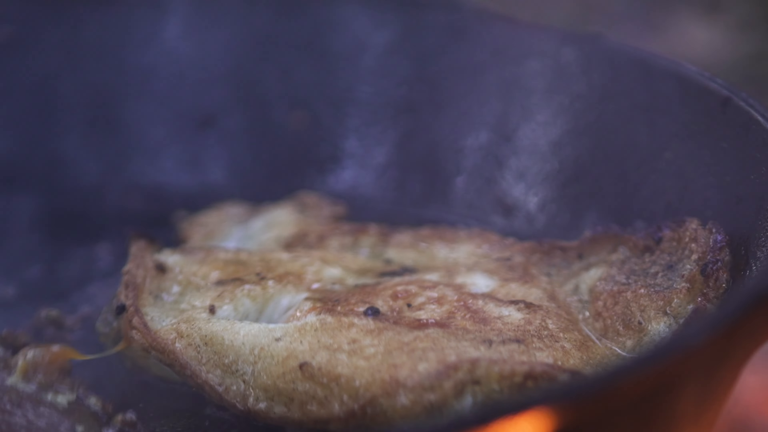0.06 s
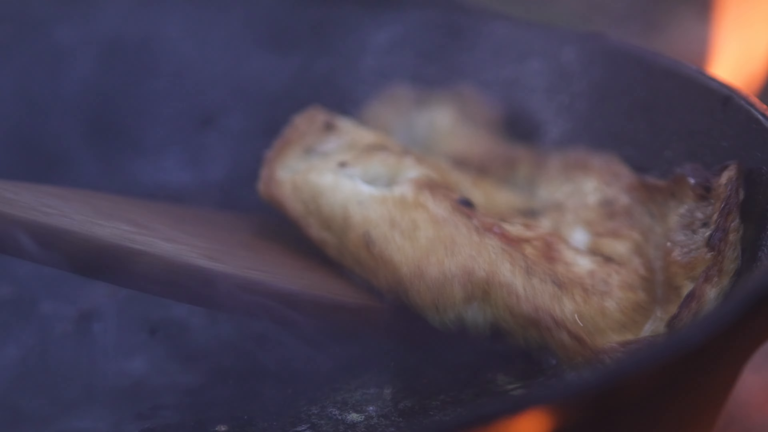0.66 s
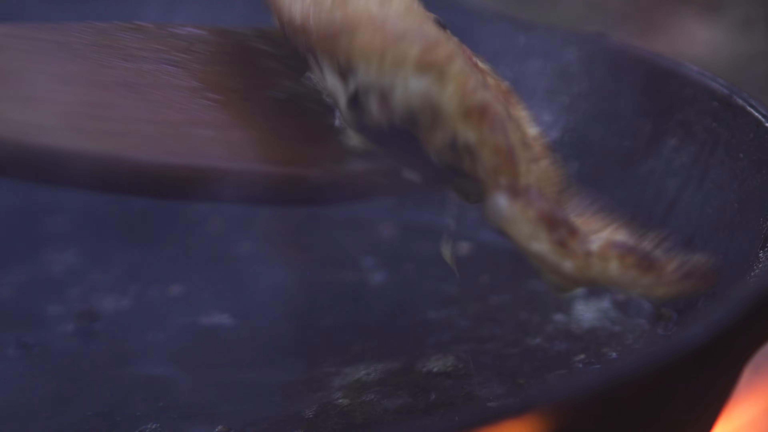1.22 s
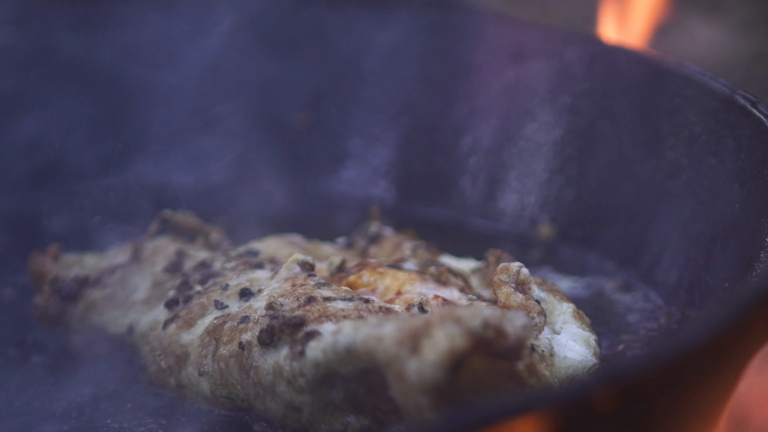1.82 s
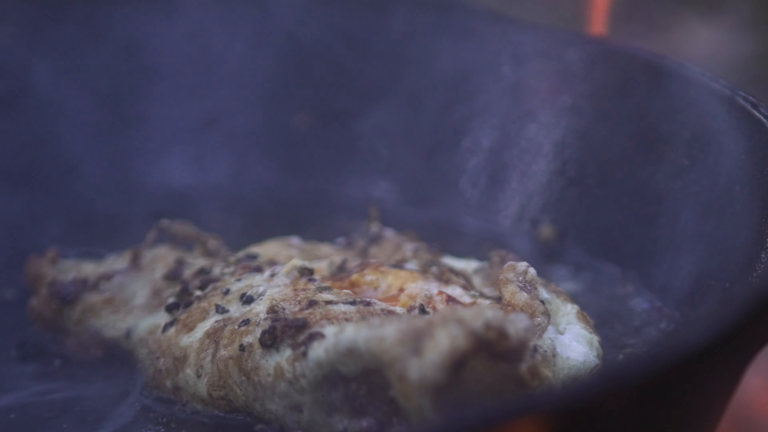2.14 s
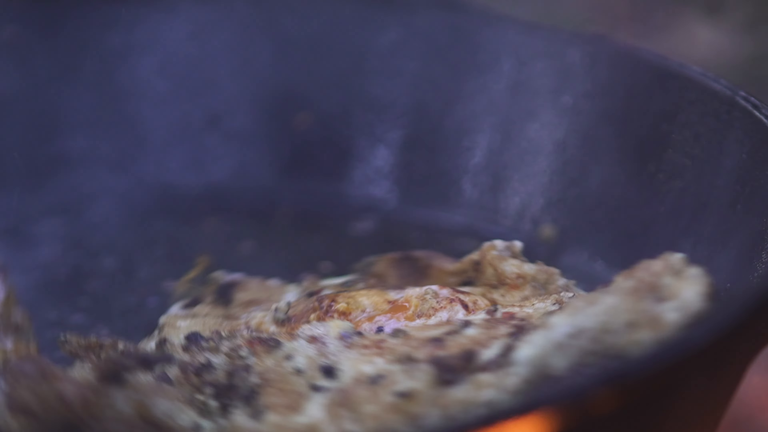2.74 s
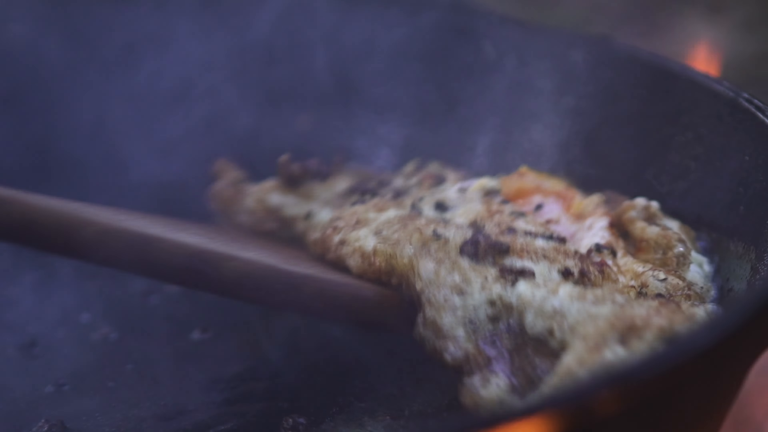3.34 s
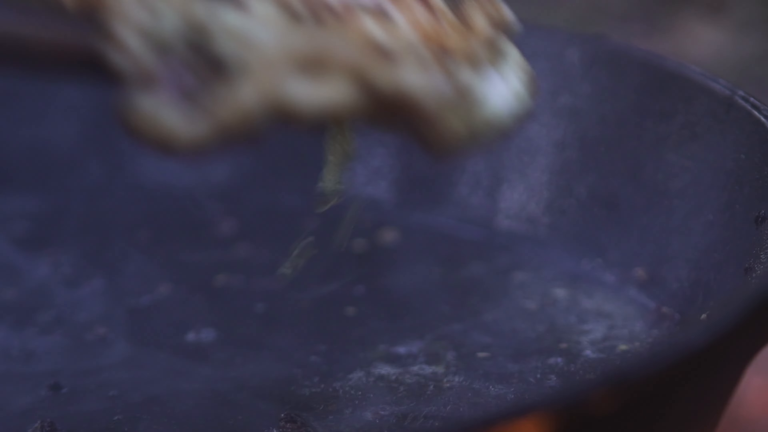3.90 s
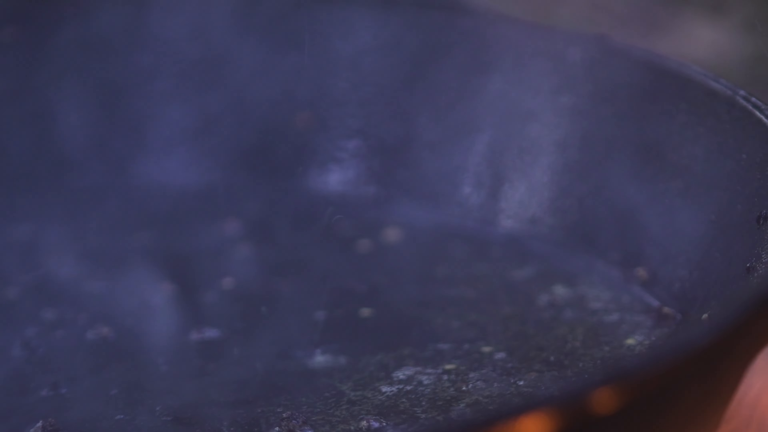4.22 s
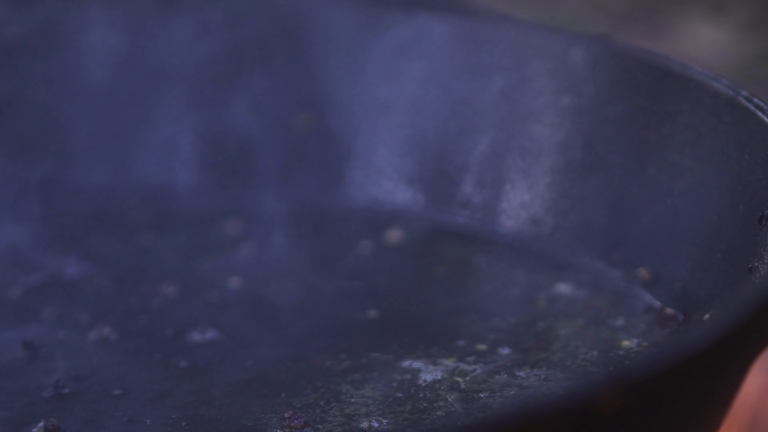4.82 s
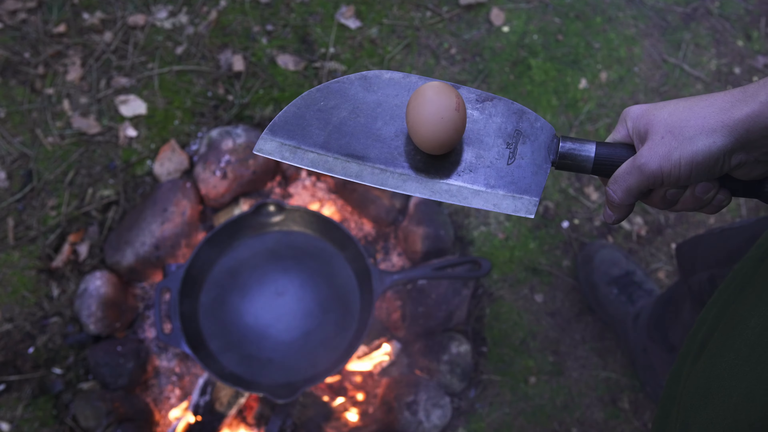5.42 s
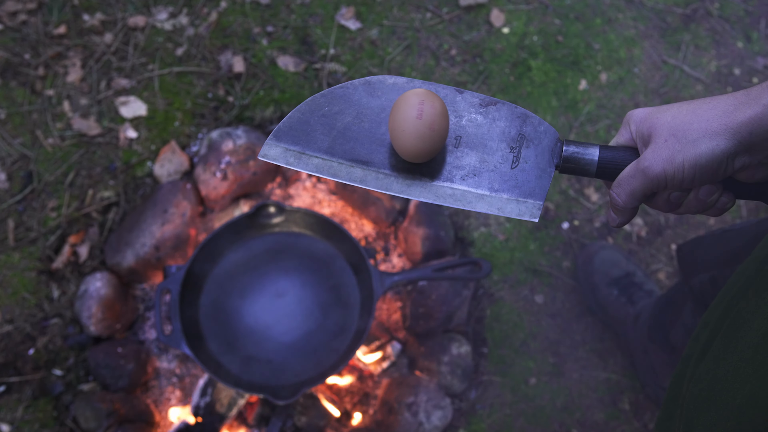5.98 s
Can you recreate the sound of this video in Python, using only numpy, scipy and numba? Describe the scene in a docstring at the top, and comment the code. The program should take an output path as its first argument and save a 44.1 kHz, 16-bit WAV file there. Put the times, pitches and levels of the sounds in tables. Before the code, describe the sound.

An egg sizzles in hot fat in a cast-iron skillet, heard very close in the open air: a bright hiss of tiny bubbles dotted with sharp spits. At about 1.1 seconds the sizzle sinks as the egg leaves the iron, then surges at 1.5 seconds when it lands flipped over. The frying stays stronger and swells again, loudest between about 2.4 and 2.9 seconds, thick with hard cracks of spitting fat. At 2.4 seconds a wooden spatula knocks the pan once, with a short, damped metallic ring, and a very sharp spit follows. The sizzle eases in smaller surges from 3 seconds and drops near 4 seconds as the egg is lifted out. The leftover fat thins to separate spits, its hiss gone by about 5 seconds, with a few faint pops and a soft knock near 5.6 seconds. A campfire flutters low and faint throughout.

```python
"""An egg fries close up in hot fat, in a cast-iron skillet over a softly fluttering campfire. Every pop from
the fat is a steam pocket that rings briefly, takes the colour of the pan's hollow and tickles the iron. Near
1.5 s a wooden spatula flips the egg and the sizzle surges; at 2.4 s it knocks the pan. Then it lifts the egg
out, and from about 4 s the fat left behind thins out to single spits; near the end the fire itself pops."""
import sys
import numpy as np
from scipy import signal
from scipy.fft import rfft, irfft
from scipy.io import wavfile
from scipy.ndimage import uniform_filter1d
from numba import njit

SR = 44100
rng = np.random.default_rng(int(sys.argv[2]) if len(sys.argv) > 2 else 0)


def inscribe(sig):
    """Save sig as 16-bit PCM at rate SR to the path in sys.argv[1].

    A 1-D sig is mono; a 2-D sig holds one channel per row.
    Samples are clipped to [-1, 1] before scaling.
    """
    pcm = np.round(np.clip(np.atleast_2d(sig).T, -1, 1) * 32767)
    wavfile.write(sys.argv[1], SR, pcm.astype(np.int16))


N = 271197
TOP_HZ = 16000  # ceiling for pitches and for the mix


# tone of the sizzle, against its mids: t/s, bass/dB, treble/dB
SIZZLE_TONE = [(0, -3.5, 6), (.13, -8.5, 2), (.19, -6.5, -4.5), (.9, -8, -2.5), (1.0, -9.5, -3.5),
               (1.35, 0, -2.5), (1.52, -12, 4.5), (1.6, -9, -5), (1.83, -4.5, 4.5), (2.0, -8, -0.5),
               (2.55, -14, -7), (2.75, -13, -4), (3.05, -9, -4.5), (3.33, -10.5, -2), (3.6, -13.5, -9),
               (3.76, -12, 0), (3.87, -10, -6.5), (4.1, -11.5, 1.5), (4.35, -8.5, 6.5), (4.9, -14, -3.5),
               (5.45, -4.5, -3.5)]

def sizzle(level_db, count=70000):
    """Thousands of tiny bubbles burst in clusters; the wetter the fat, the denser and louder."""
    bass_db, treble_db = curves(SIZZLE_TONE)
    boil = undb(0.77 * (level_db + 25.5))
    at, alive = random_times(4800 * boil * undb(2.7 * walk(size=200)), count)
    size = undb(4.38 * np.minimum(rng.exponential(size=count), 4.2))
    hz = np.clip(5200 * np.exp(0.736 * rng.standard_normal(count)), 600, TOP_HZ)
    # small bubbles ring for a few cycles; violent ones tear open with a dry crack
    q = 1.24 * 8 ** rng.random(count) / size ** 0.22
    crackle = pops(at[alive] / SR, size[alive], hz[alive], q[alive], soft=0.)
    # steam hisses between the pops and dries up before they do
    hiss = undb(3.5) * boil ** 0.97 * rng.standard_normal(N)
    bubbles = bowl(crackle + hiss)
    # large, middling and tiny bubbles each follow their own share of the boil
    bass, below_treble = (signal.sosfiltfilt(signal.butter(4, split_hz, fs=SR, output="sos"), bubbles)
                          for split_hz in (2000, 7000))
    flicker_db = 2 * walk(size=1300)
    bands = [(bass, bass_db), (below_treble - bass, 0), (bubbles - below_treble, treble_db + flicker_db)]
    return sum(even(band, size=2200) * undb(level_db + db - 3) for band, db in bands)


# bed of frying, which sinks whenever the egg is off the iron and dries up at the end: t/s, level/dB
FRYING_BED = [(0, -32), (.2, -32.5), (.9, -32.5), (1.12, -36), (1.2, -42.5), (1.44, -38), (1.6, -29.5),
              (1.86, -27.5), (2.1, -25), (3.0, -24.5), (3.33, -29), (3.8, -31), (4.02, -41.5),
              (4.45, -44.5), (4.85, -48.5), (5.05, -60), (5.45, -71), (5.7, -75.5)]
# wet egg lands, is pushed onto hot iron or drips: t/s, rise/s, hold/s, decay/s, level/dB
SURGES = [(1.452, 0.13, 0.055, 0.12, -18.5), (1.881, 0.1, 0.006, 0.071, -26),
          (2.156, 0.555, 0.22, 0.022, -20), (3.052, 0.076, 0.083, 0.11, -23.5),
          (3.334, 0.12, 0.17, 0.069, -26), (4.079, 0.055, 0.013, 0.086, -34),
          (4.227, 0.036, 0.015, 0.03, -42.5)]

def boiling():
    """The sizzle's fader in dB: steady frying plus the surges."""
    steady_db, = curves(FRYING_BED)
    surges = sum(undb(db) * swell(*shape) for *shape, db in SURGES)
    return 20 * np.log10(np.hypot(undb(steady_db), surges))


# featured spits: t/s, level/dB, f/Hz, ring/Q, spatter against the spit/dB
SPITS = [(0.0463, -15.5, 5450, 0.49, -6), (0.076, -23.5, 6600, 0.9, 6), (0.1235, -21.5, 8200, 2.9, -20),
         (0.134, -23, 6370, 4.1, 6), (0.2546, -29, 3350, 1.6, 9.5), (0.296, -24, 2640, 6.8, 3),
         (0.4242, -17, 3950, 8.2, -3.5), (0.4733, -15, 2620, 3.5, -11), (0.496, -27, 6800, 18, -10),
         (0.5757, -20.5, 3260, 7.1, -6), (0.6599, -24.5, 2650, 3.7, 2.5), (0.6886, -16, 4550, 5, -14),
         (0.7445, -27.5, 10500, 3, 3), (0.7823, -23, 9150, 2.3, 1), (0.8734, -17.5, 4350, 3.2, -23),
         (0.8911, -23.5, 3570, .8, 2), (0.907, -20.5, 4330, 11, -18), (1.0637, -16.5, 4240, 0.37, -4.5),
         (1.1394, -26.5, 6600, 6, -4), (1.2592, -26.5, 3270, 3.3, -4), (1.2896, -22, 3460, 0.59, -20),
         (1.3684, -23.5, 4700, 4, -10), (1.3991, -23, 5000, 17, -22), (1.4852, -15.5, 4630, 5.6, -9),
         (1.7146, -12.5, 3800, 3, -23), (1.7474, -8.5, 2480, 0.59, -21), (1.8166, -14, 5600, 1.3, -9),
         (1.9148, -12, 4000, 0.8, -16), (1.9998, -13, 4360, 3.5, -24), (2.0076, -12.5, 4000, 1.5, -20),
         (2.3129, -11, 4430, 3.1, -14), (2.5556, -2, 4600, 4.1, -41), (2.5837, -10, 4970, 6.3, -20),
         (2.6776, -15, 6680, .78, -5), (2.737, -12.5, 6000, 0.45, -2), (2.7905, -10.5, 3360, .67, -14),
         (2.8156, -10.5, 4100, 0.46, -26), (2.8376, -14, 4660, 8.5, -24), (2.868, -13, 2400, 12, -10),
         (2.8767, -10, 4520, 4.7, -16), (2.8825, -8, 4000, 0.46, -29), (2.9073, -9, 4300, 3, -19),
         (2.9125, -11, 5000, 1.5, -12), (2.938, -12.5, 4200, 2.2, -12), (3.0066, -18, 5000, 1.4, -19),
         (3.1534, -10, 2290, 18, -5), (3.2596, -12.5, 3570, 3.5, -1), (3.427, -23, 5400, 0.83, -6),
         (3.4845, -17.5, 2800, 2.6, 4.5), (3.5837, -6.5, 2230, 7.3, -2.5), (3.861, -18, 3870, 4.4, -13),
         (3.9609, -17.5, 3500, 2.3, -22), (4.039, -18.5, 3030, 2.8, -4), (4.1155, -17, 3280, 5.1, -8),
         (4.2197, -14, 5470, 1.2, -10), (4.3169, -23, 5500, 8, -7), (4.4288, -39, 7850, 5, -18),
         (4.437, -26.5, 3400, 5.2, -10), (4.4843, -25.5, 7100, 9.6, -12), (4.545, -30.5, 7450, 1.3, 1),
         (4.6099, -23.5, 5800, 2.8, -5), (4.6478, -22.5, 9800, 1.1, -25), (4.6733, -24.5, 8700, 0.72, -31),
         (4.725, -27, 7460, 1.5, -9), (4.7787, -25, 3040, 0.79, -1), (4.8098, -16.5, 3500, 12, -24),
         (4.8205, -29, 4680, 2.6, -20), (4.8755, -36.5, 8520, 0.8, -11), (4.9275, -34.5, 6360, 13, -10),
         (4.9412, -31.5, 3230, 0.6, -9), (5.0095, -37.5, 3300, 1.5, -18), (5.023, -29, 3730, 8.5, -8.5),
         (5.041, -46, 8600, 1.5, -1), (5.0712, -37.5, 3000, 1, -19), (5.1897, -18, 6140, 1.6, -18),
         (5.2318, -32, 4900, 1.2, -19), (5.2528, -30, 10700, 4.3, -22), (5.3065, -38, 8400, 5.1, -15),
         (5.3665, -23.5, 5050, 8.6, -18), (5.3798, -40, 6720, 3.6, -17), (5.6192, -32, 2355, .5, -15.5),
         (5.8325, -40, 4890, 6.5, -23)]

def spits(level_db):
    """Large steam pockets crack amid spattering droplets, and near the end the fire itself pops; returns the
    sound and the kick to the iron."""
    s, db, hz, q, spatter_db = np.vstack([SPITS, stray_spits(level_db)]).T.copy()
    hz, q = np.minimum(hz, TOP_HZ), np.maximum(q, .5)
    spatter = np.zeros(N)
    for start, pitch, droplets_db in zip(s, hz, db + spatter_db):
        # the pocket starts to leak just before it cracks
        add(spatter, start - .0012, undb(droplets_db) / 2 * burst(pitch, octaves=1.4, rise_s=0.0019))
    cracks = pops(s, undb(db), hz, q, soft=0.)
    # the longer a pocket rings, the harder it kicks the iron
    kick_db = -67 + 14.5 * np.log10(q)
    kick = pops(s, undb(db + kick_db), hz, q, soft=0.)
    return bowl(cracks + spatter), kick


def stray_spits(level_db, per_second=17, count=200):
    """Lesser spits come by chance and grow louder with the sizzle; returns rows like those of SPITS."""
    at, alive = random_times(np.full(N, per_second), count)
    loud, pitch, ring = np.clip(rng.standard_normal((count, 3)), -2, 2).T
    db = -31.5 + 0.97 * (level_db[at] + 30.5) + 6.5 * loud
    hz = 5290 * 2 ** (.5 * pitch)
    q = 3.6 * 2 ** ring
    spatter_db = np.full(count, -6)
    return np.column_stack([at / SR, db, hz, q, spatter_db])[alive]


# steam squeezed out under the egg and through the fat: t/s, f/Hz, level against the sizzle/dB
SQUEAKS = [(0, 6360, 1.5), (.5, 6100, -11), (1.15, 6160, -19.5), (1.45, 5150, -4), (2.45, 5000, -2.5),
           (2.8, 4900, -1.5), (3.0, 2700, -3.5), (3.3, 3300, -17.5), (3.53, 3840, -3.5), (3.73, 5600, -4.5),
           (3.88, 5100, 6), (4.12, 4470, 4), (4.5, 7730, 9), (4.7, 7100, -12)]

def squeaks(level_db, count=8000):
    """Steam forced through narrow gaps: tiny, soft-edged blips whose pitch follows the gap."""
    centre_hz, share_db = curves(SQUEAKS)
    at, alive = random_times(520 * undb(.45 * (level_db + 28.5)), count)
    hz = np.minimum(centre_hz[at] * np.exp(0.19 * rng.standard_normal(count)), TOP_HZ)
    size = undb(6.5 * np.minimum(rng.standard_normal(count), 1.7))
    q = 2 * 3.2 ** rng.random(count)
    blips = pops(at[alive] / SR, size[alive], hz[alive], q[alive], soft=1.)
    return even(blips, size=3500) * undb(level_db + share_db)


def under_egg(x, centre_s=2.55, span_s=.15, hz=7600, width_hz=1630, dip_db=-7):
    """The egg lies flat over the bubbles for a moment and scoops one band out of their treble."""
    depth_db = dip_db * np.exp(-((np.arange(N) / SR - centre_s) / span_s) ** 2)
    band = signal.lfilter(*signal.iirpeak(hz, hz / width_hz, fs=SR), x)
    return x + (undb(depth_db) - 1) * band


# air resonances between the pan's floor and walls: f/Hz, width/Hz, boost/dB
CAVITY_PEAKS = [(1916, 170, 3.5), (2900, 130, 4.5), (3687, 350, 2), (5700, 1200, 2), (10000, 580, 0.5)]
# EQ on the bubbles as they leave the pan: f/Hz, gain/dB
BOWL_EQ = [(100, -23.5), (350, -18), (550, -6), (1000, -5), (1600, -4), (2000, -1.5), (4500, 3),
           (7000, 5.5), (10000, 9), (15500, 3.5)]

def bowl(x):
    """The hollow of the pan lifts a few broad resonances and thins the bass."""
    for hz, width, db in CAVITY_PEAKS:
        x = x + (undb(db) - 1) * signal.lfilter(*signal.iirpeak(hz, hz / width, fs=SR), x)
    return colour(x, BOWL_EQ)


# spatula and egg rubbing on the pan floor: t/s, hold/s, level/dB
RUBS = [(-.04, 0.49, -85.5), (0.76, 0.035, -88), (1.426, 0.17, -81), (2.56, 0.087, -76), (2.85, .35, -90.5)]
# wooden spatula hitting the pan: t/s, level/dB
SPATULA_HITS = [(1.426, -34), (2.4196, -13.5)]

def spatula():
    """Force of soft wood rubbing and knocking on the iron, dull enough to wake mainly its low modes."""
    strokes = sum(undb(db) * swell(s, rise_s=.045, hold_s=hold, fall_s=.085) for s, hold, db in RUBS)
    friction = unit(butter(rng.standard_normal(N), 769, "lowpass", order=4))
    force = friction * strokes * undb(2 * walk(size=700))
    contact = np.hanning(50)  # about a millisecond
    for s, db in SPATULA_HITS:
        add(force, s, undb(db) * contact / contact.sum())
    return force


# ring of the cast iron: f/Hz, level/dB, t60/s
IRON_MODES = [(555, -4, .21), (964, 4, 0.049), (1906, -11, 0.037), (2640, -4.5, .12), (2950, 1, 0.15),
              (3090, -1, .13), (3290, 3, .19), (3560, 1.5, .11), (3970, 5, .11), (4216, -11.5, 0.097),
              (4480, 6, .12), (4823, -20.5, .15), (5370, 6.5, 0.1), (5992, -8.5, .14), (6350, 1.5, .08),
              (6700, -4.5, .08), (8300, -3.5, .06), (9200, -3.5, .06)]

def skillet(force):
    """The iron rings in its modes, damped by the food and the fire bed."""
    t = np.arange(SR // 2) / SR
    ring = sum(undb(db) * np.cos(2 * np.pi * hz * t) * np.exp(-np.log(1000) * t / t60)
               for hz, db, t60 in IRON_MODES)
    # a small pan radiates little bass
    return butter(signal.fftconvolve(force, ring)[:N], 450, "highpass", order=5)


# low thumps under the sizzle: t/s, level/dB, f/Hz, length/s
THUMPS = [(.473, -40, 213, .0056), (.776, -40, 220, .01), (1.094, -39, 160, .009), (2.554, -30, 157, .003),
          (2.834, -30.5, 170, .004), (2.88, -36, 200, .0035), (4.218, -44, 260, .004),
          (4.696, -52, 400, .048), (4.888, -51, 830, .004), (4.978, -41, 750, .0022),
          (5.082, -53, 404, .0035), (5.589, -49, 450, .01), (5.615, -36, 330, .007),
          (5.617, -38.5, 1100, .0032)]

def thumps():
    """Short, dull thumps: some sit under the loudest, overloaded spits; others are soft knocks and puffs."""
    out = np.zeros(N)
    for s, db, hz, length in THUMPS:
        add(out, s, undb(db) * burst(hz, octaves=2, rise_s=length / 2))
    return out


# dark EQ of the flames and the still air: f/Hz, gain/dB
FLAME_EQ = [(20, -2), (60, -1.5), (130, 2.5), (220, 3.5), (400, -8), (800, -17.5), (2000, -26),
            (6000, -31.5), (16000, -33)]
# draught of the fire: t/s, level/dB
DRAUGHT = [(0, -52.5), (1.9, -54), (3.5, -60.5), (5.3, -60.5), (5.55, -55), (6.15, -58)]

def flames():
    """The fire flutters softly under the pan, riding its draught."""
    draught_db, = curves(DRAUGHT)
    rumble = unit(colour(rng.standard_normal(N), FLAME_EQ))
    return rumble * undb(draught_db + 2 * walk(size=900))


def surroundings(x, size=8192):
    """Stones and ground scatter each band into a short diffuse tail; trees return a faint longer one."""
    t = np.arange(size) / SR
    fade = sum(undb(2 * db) * np.exp(-t / decay_s) / (decay_s * SR)
               for db, decay_s in [(-17, .0013), (-27, .012)])
    edges_hz = np.geomspace(700, TOP_HZ, 9)
    out = x
    for band in zip(edges_hz, edges_hz[1:]):
        power = signal.fftconvolve(butter(x, band, "bandpass", order=3) ** 2, fade)[:N]
        wash = unit(butter(rng.standard_normal(N), band, "bandpass", order=3))
        out = out + np.sqrt(np.abs(power)) * wash
    return out


@njit
def pops(s, size, hz, q, soft):
    """Each bursting bubble is a damped sine whose energy follows size; soft (0-1) rounds its attack."""
    out = np.zeros(N)
    for k in range(len(s)):
        first = int(s[k] * SR) + 1
        tau = q[k] / (np.pi * hz[k])
        pole = -1 / tau + 2j * np.pi * hz[k]
        z = size[k] * np.sqrt(.004 / tau) * np.exp(pole * (first / SR - s[k]))
        step = np.exp(pole / SR)
        for i in range(first, min(first + int(9 * tau * SR), N)):
            out[i] += z.imag * (1 - soft + soft * (i - first) / (tau * SR))
            z *= step
    return out


def burst(hz, octaves, rise_s, size=4096):
    """A puff of noise around hz that swells to rms 1 and dies."""
    band = [hz * 2 ** (-octaves / 2), min(hz * 2 ** (octaves / 2), TOP_HZ)]
    age = np.arange(size) / SR / rise_s
    return unit(butter(rng.standard_normal(size), band, "bandpass")) * age * np.exp(1 - age)


def random_times(per_second, count):
    """Sample indices of count candidate bubbles, and which of them burst at the given rate."""
    when, lot = rng.random((2, count))
    at = (when * N).astype(int)
    return at, lot < per_second[at] * N / SR / count


def swell(start, rise_s, hold_s, fall_s):
    """Envelope that rises, holds and dies away."""
    age = np.arange(N) / SR - start
    return np.clip(age / rise_s, 0, 1) * np.exp(-np.maximum(age - rise_s - hold_s, 0) / fall_s)


def curves(table):
    """Columns of a table as automation lanes, one value per sample."""
    s, *columns = np.transpose(table)
    return [np.interp(np.arange(N) / SR, s, c) for c in columns]


def walk(size):
    """Random wander of spread 1 that changes every size samples."""
    steps = np.repeat(rng.standard_normal(N // size + 1), size)
    return unit(smooth(steps, size)[:N])


def even(x, size):
    """Hold the slow level at 1 and keep the crackle."""
    return x / np.sqrt(np.abs(smooth(x ** 2, size)) + 1e-6)


def smooth(x, size):
    """Triangular running mean."""
    return uniform_filter1d(uniform_filter1d(x, size), size)


def colour(x, points, size=2048):
    """Minimum-phase EQ through points of f/Hz, gain/dB."""
    hz, db = np.transpose(points)
    grid = np.maximum(np.fft.rfftfreq(size, 1 / SR), 1)
    gain = undb(np.interp(np.log(grid), np.log(hz), db))
    cepstrum = irfft(np.log(gain))
    cepstrum[1:size // 2] *= 2
    cepstrum[size // 2 + 1:] = 0
    return signal.fftconvolve(x, irfft(np.exp(rfft(cepstrum))))[:N]


def butter(x, hz, kind, order=2):
    """Causal Butterworth filter."""
    return signal.sosfilt(signal.butter(order, hz, kind, fs=SR, output="sos"), x)


def add(out, s, x):
    """Mix x into out from time s."""
    i = int(s * SR)
    out[i:i + len(x)] += x[:max(N - i, 0)]


def undb(db):
    """Decibels to gain."""
    return 10 ** (np.asarray(db) / 20)


def unit(x):
    """Scale to rms 1."""
    return x / np.sqrt(np.mean(x ** 2))


def scene():
    """Fat, iron and fire in one close mono mix."""
    level_db = boiling()
    frying = under_egg(sizzle(level_db) + squeaks(level_db))
    spitting, kick = spits(level_db)
    iron = skillet(spatula() + undb(-76.5) * frying + kick)
    return (surroundings(frying + spitting + iron + thumps()) + flames())[None]


def record(dry):
    """The sharpest spits clip at full scale; a steep low-pass cuts the top."""
    high_cut = signal.ellip(8, .2, 70, TOP_HZ, fs=SR, output="sos")
    return signal.sosfilt(high_cut, np.clip(dry, -1, 1))


dry = scene()
out = record(dry)
inscribe(out)
```